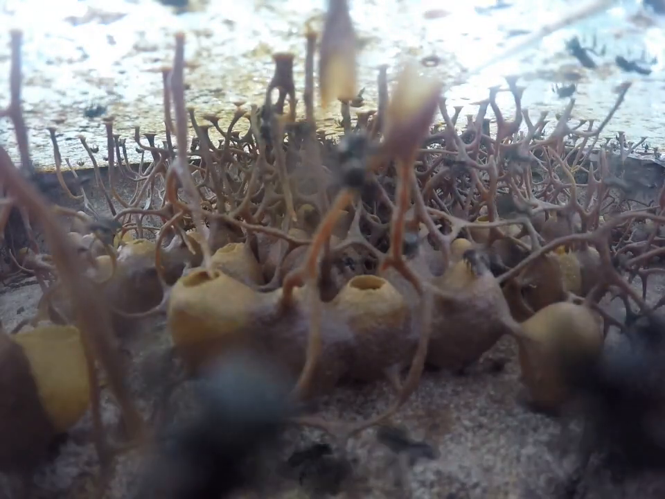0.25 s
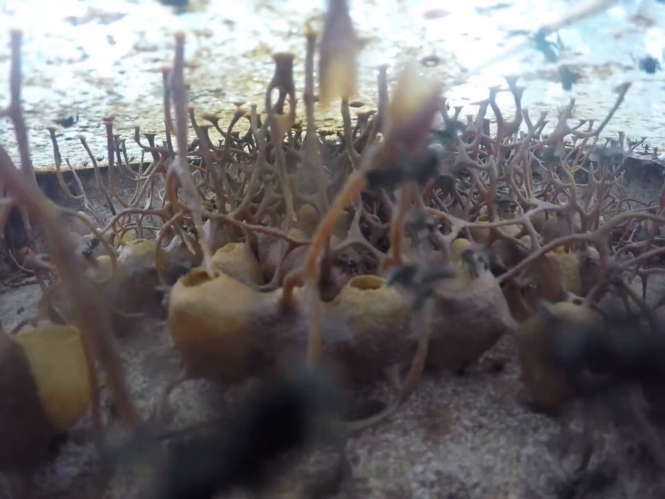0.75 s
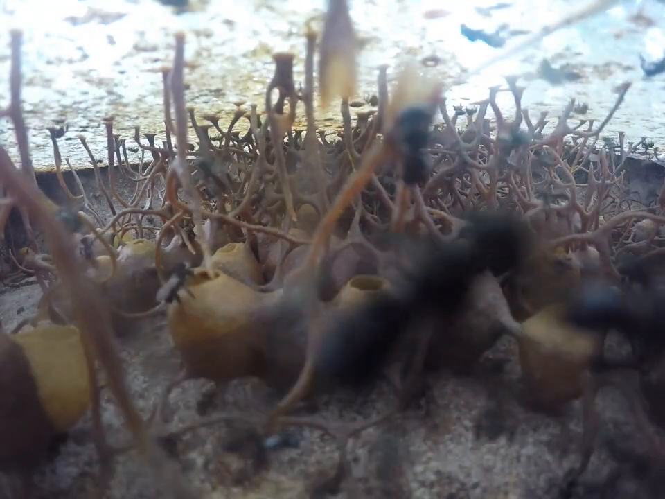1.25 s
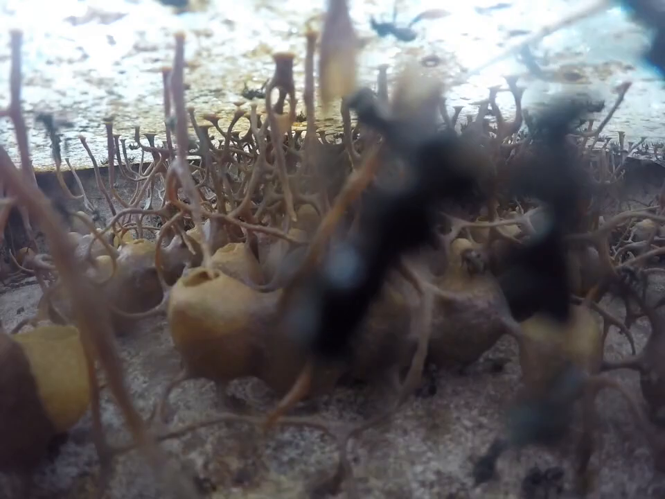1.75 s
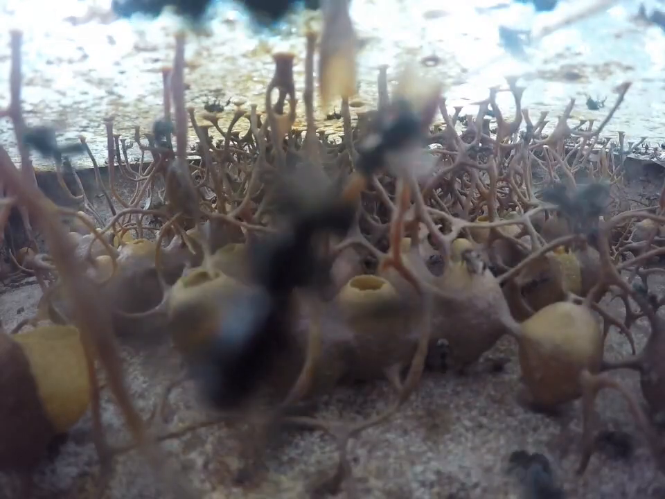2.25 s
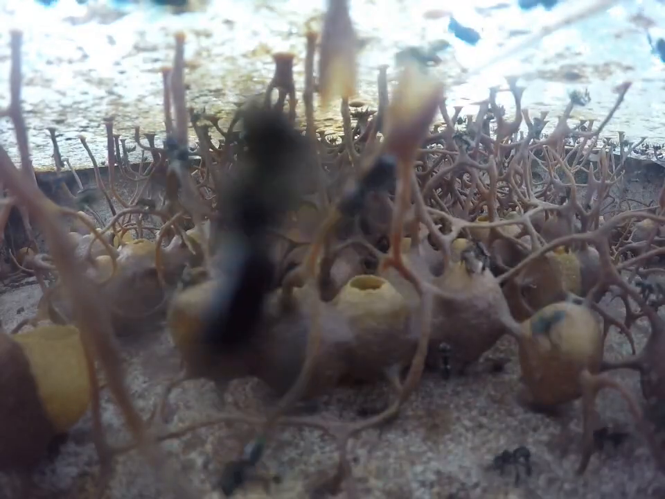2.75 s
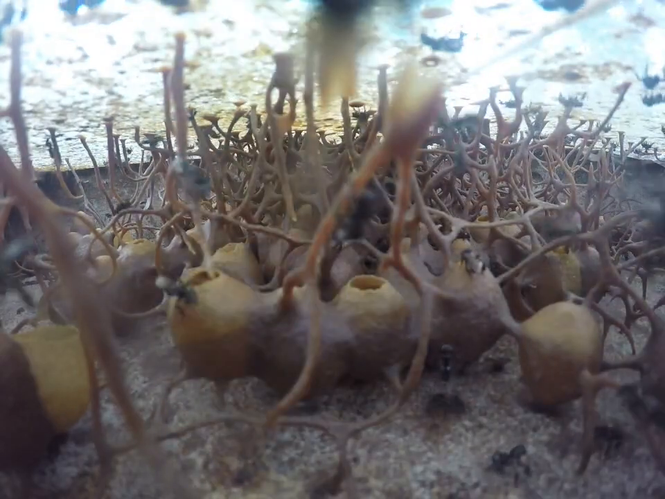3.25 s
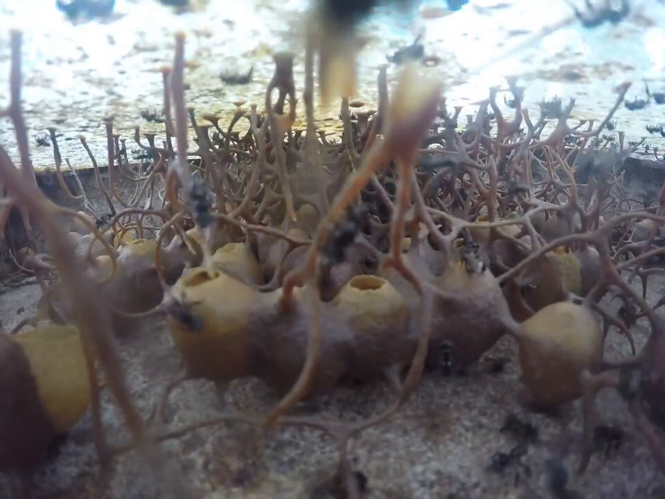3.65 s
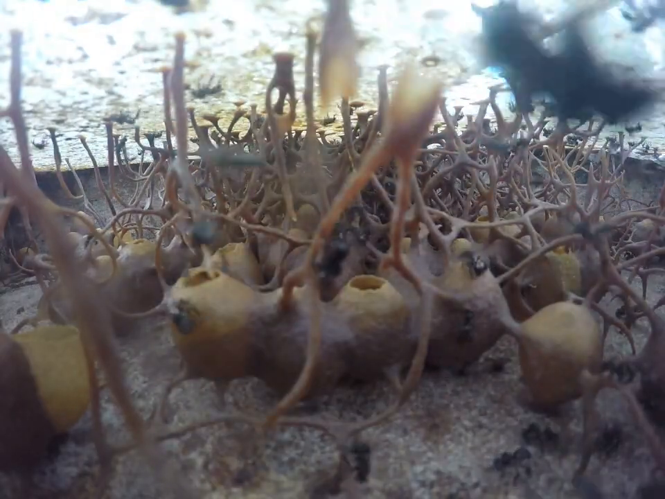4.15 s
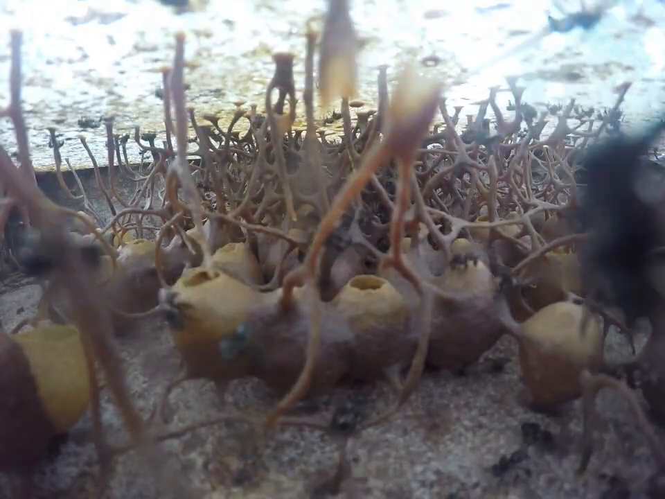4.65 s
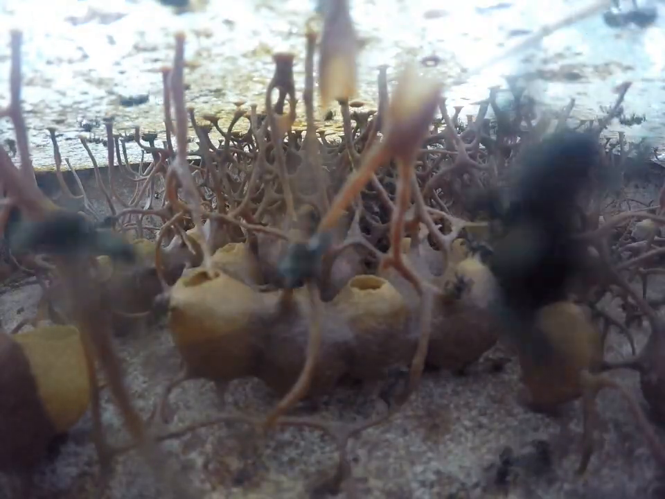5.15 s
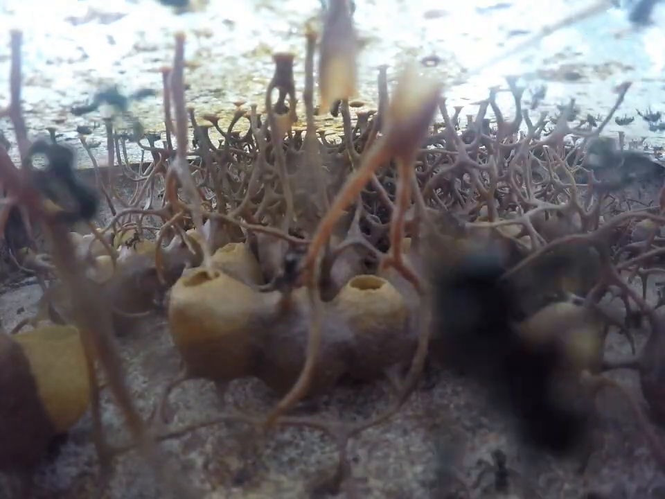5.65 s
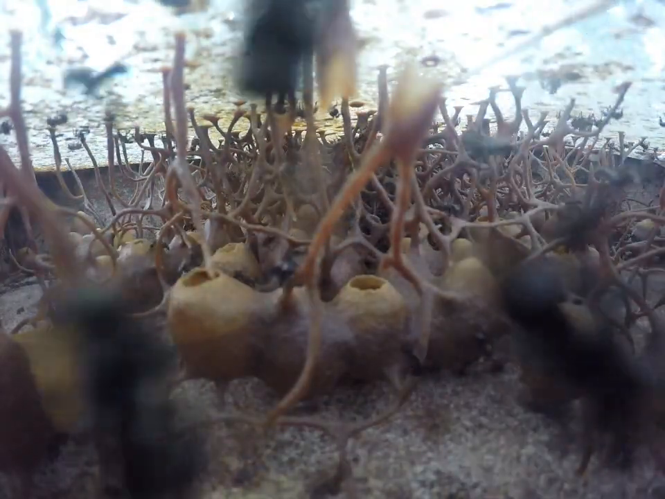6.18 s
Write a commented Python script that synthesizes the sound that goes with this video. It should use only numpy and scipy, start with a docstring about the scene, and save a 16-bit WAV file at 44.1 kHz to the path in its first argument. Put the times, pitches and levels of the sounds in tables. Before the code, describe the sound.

Stingless bees tick and scurry in a wooden nest box, wings buzzing in short raspy bursts, hitting the lid midway and drumming close at the end.

```python
"""Stingless bees inside a wooden nest box, one microphone by a small camera among their wax pots.
A faint hum deep in the nest, rumble, hiss and ticking feet run throughout; bodies bump hollow pots.
Early bursts of wing strokes brush wax struts some way in; each stroke is air puff, tap and bright scrape.
Scattered wing flicks go on between; midway a bee beats on the lid overhead, and hard clacks fall there.
At the end wings drum on the camera housing, which rings clearly."""
import sys
import numpy as np
from scipy import signal
from scipy.fft import rfft, irfft
from scipy.io import wavfile
from scipy.ndimage import uniform_filter1d, map_coordinates

SR = 44100
rng = np.random.default_rng(int(sys.argv[2]) if len(sys.argv) > 2 else 0)


def master_out(mix):
    """Clip the mix to full scale and print it as 16-bit PCM to the path in sys.argv[1]."""
    frames = np.transpose(np.atleast_2d(mix))
    ceiling = np.clip(frames, -1, 1)
    pcm = np.round(ceiling * 32767).astype(np.int16)
    wavfile.write(sys.argv[1], SR, pcm)


N = 283122
RING_SIZE = 2048   # samples in each impulse response and noise burst


def from_db(db):
    """Decibels to amplitude gain."""
    return 10 ** (np.asarray(db) / 20)


def rms_one(x):
    """Scale to rms 1."""
    return x / np.sqrt(np.mean(x ** 2) + 1e-20)


def unit_energy(x):
    """Scale to energy 1."""
    return x / np.sqrt(np.sum(x ** 2) + 1e-20)


def drift(rate_hz):
    """Smooth random wandering with a spread of about 1, from knots at the given rate."""
    knots = rng.standard_normal(1024)
    return map_coordinates(knots, [np.arange(N) / SR * rate_hz], order=3, mode="wrap")


def swell(t, middle_s, half_s):
    """A smooth rise and fall of height 1, down to 1/e at half_s from the middle."""
    return np.exp(-((t - middle_s) / half_s) ** 2)


def dying_noise(decay_s):
    """A burst of noise that dies away exponentially; energy 1."""
    t = np.arange(RING_SIZE) / SR
    return unit_energy(rng.standard_normal(RING_SIZE) * np.exp(-t / decay_s))


def minimum_phase(power):
    """The impulse response of a power spectrum with its energy as early as causality allows."""
    cepstrum = irfft(np.log(power + 1e-8) / 2)
    cepstrum[1:RING_SIZE // 2] *= 2
    cepstrum[RING_SIZE // 2 + 1:] = 0
    return irfft(np.exp(rfft(cepstrum)))


def responses(resonances):
    """Resonant impulse responses of a place, split into low (air), middle (tap) and high (scrape) parts."""
    # edges of the three parts [Hz]
    part_edges_hz = [150, 1750, 4000, 20000]
    hz = np.arange(RING_SIZE // 2 + 1) * SR / RING_SIZE + 1
    power = np.zeros(len(hz))
    for centre_hz, width_hz, level_db in resonances:
        offset = (hz - centre_hz) / width_hz
        power += from_db(level_db) ** 2 / (1 + offset ** 2 * 2) ** 2
    # overlapping weak modes fill the valleys
    power = power + from_db(-15.5) ** 2 * uniform_filter1d(power, size=121)
    parts = []
    for low_hz, high_hz in zip(part_edges_hz, part_edges_hz[1:]):
        band = 1 / (1 + (low_hz / hz) ** 16) / (1 + (hz / high_hz) ** 16)
        parts.append(minimum_phase(power * band))
    return parts


def in_box(drive, part, echo, echo_s):
    """Direct sound plus short reflections, whose pattern changes as the bee moves."""
    turns = rng.random() + 4.78 * np.arange(len(drive)) / SR   # 4.78 pattern cycles per second
    angle = 2 * np.pi * turns
    sound = signal.fftconvolve(drive, unit_energy(part))
    for weight in (np.cos(angle), np.sin(angle)):
        scatter = np.roll(dying_noise(echo_s), 16)   # 16 samples behind the direct sound
        reflections = unit_energy(signal.fftconvolve(part, scatter)[:RING_SIZE])
        sound += echo * signal.fftconvolve(drive * weight, reflections)
    return sound / np.sqrt(1 + echo ** 2)


def strokes(times_s, levels_db, place, rough, uneven_db, scrape_s, echo, echo_s):
    """A run of contacts, each a repeating click mixed with a fresh scatter of tiny contacts."""
    starts = np.round(np.asarray(times_s) * SR).astype(int)
    first = starts[0]
    size = starts[-1] - first + RING_SIZE
    force = rng.normal(0, 1, len(starts))
    out = np.zeros(N + 8 * RING_SIZE)
    reflected = (1.2, 1.1, .75)   # wax swallows the treble
    shares = np.clip(rough, 0, 1)
    for part, part_db, share, contact_s, wet in zip(place, levels_db, shares, scrape_s, reflected):
        drive = np.zeros(size)
        stroke_db = part_db + uneven_db * np.sqrt(share) * force
        gains = from_db(stroke_db) * np.sqrt(.004 * SR)   # each has the energy of 4 ms at its level
        for at, gain in zip(starts - first, gains):
            drive[at] += gain * np.sqrt(1 - share)
            drive[at:at + RING_SIZE] += gain * np.sqrt(share) * dying_noise(contact_s)
        sound = in_box(drive, part, wet * echo, echo_s)
        out[first:first + len(sound)] += sound
    return out[:N]


def background():
    """Noise shaped into low rumble and even hiss, with a soft boom of the box."""
    # spectrum of the steady noise, relative: frequency_hz, density_db (per Hz)
    noise_shape = [(12, -36), (20, 0.5), (55, -1.5), (70, -5.5), (130, -5.5), (172, -12), (255, -12),
                   (319, -11.5), (388, -13.5), (780, -14.5), (897, -13.5), (2910, -16.5), (5850, -24.5),
                   (14700, -33), (16000, -32)]
    level_db, boom_hz, boom_db = -52.5, 48, 6
    hz = np.arange(N // 2 + 1) * SR / N + 1
    points_hz, points_db = np.transpose(noise_shape)
    shape_db = np.interp(np.log(hz), np.log(points_hz), points_db)
    shape_db = shape_db + boom_db / (1 + ((hz - boom_hz) / 5) ** 2)
    spectrum = rfft(rng.standard_normal(N)) * from_db(shape_db)
    return from_db(level_db) * rms_one(irfft(spectrum, N))


def hum(rate_hz, level_db, overtones_db):
    """Wings beating in free air: a soft tone with a few overtones."""
    phase = 2 * np.pi * np.cumsum(rate_hz) / SR
    partials_db = [0, *overtones_db]
    tone = sum(from_db(db) * np.sin(k * phase) for k, db in enumerate(partials_db, 1))
    return from_db(level_db) * rms_one(tone)


def colony_hum():
    """Distant workers waver, swell and fade; nearer ones pass with a steadier, sinking note."""
    # humming workers deep in the nest, on average: wingbeat_hz, level_db
    deep_hummers = [(120, -67.5), (133, -63.5), (146, -65)]
    # a worker hums past nearer by: closest_s, half_length_s, wingbeat_hz (when closest), level_db
    near_passes = [(0.25, 0.08, 114, -56), (1.71, 0.08, 127, -56), (2.2, 0.22, 127.5, -54),
                   (5.302, 0.08, 128, -55)]
    sag_hz_per_s = 32
    out = np.zeros(N)
    for hz, level_db in deep_hummers:
        rate_hz = hz * (1 + .04 * drift(4) + 0.054 * drift(45))
        out += hum(rate_hz, level_db + 3.0 * drift(6), (-3, -15))
    t = np.arange(N) / SR
    waver = 1 + 0.0143 * drift(30)   # shared by all passes
    for closest_s, half_s, hz, level_db in near_passes:
        sinking_hz = hz - sag_hz_per_s * np.clip(t - closest_s, -2 * half_s, 2 * half_s)
        out += swell(t, closest_s, half_s) * hum(sinking_hz * waver, level_db, (-11, -19))
    return out


def scurry(place):
    """Many small feet tick on wax and wood, most of them faintly, in bouts near the microphone."""
    # bouts of scurrying: middle_s, half_length_s, level_db
    scurry_bouts = [(0.25, 0.31, -54), (0.787, 0.15, -54), (1.12, 0.17, -51), (1.45, 0.45, -60),
                    (2.366, 0.63, -54), (3.132, 0.098, -53.5), (3.608, 0.12, -45.5), (4.15, 0.67, -57.5),
                    (4.643, 0.16, -52.5), (4.975, 0.37, -56), (6.082, 0.041, -47), (6.296, 0.2, -51.5)]
    rest_db = -61.5   # between the bouts
    sizes_db = 4.1 * np.minimum(rng.exponential(1, N), 4)
    sizes = from_db(sizes_db) * rng.choice([-1, 1], N)
    steps_per_s = 600 * from_db(5 * drift(28))   # steps come in clumps
    steps = sizes * (rng.random(N) < steps_per_s / SR)
    part_gains = from_db([-10, .6, 0])
    body = sum(unit_energy(part) * gain for part, gain in zip(place, part_gains))
    spots = rng.integers(0, 10, N)   # each spot in the nest has its own echoes
    echoes = np.zeros(N)
    for spot in np.unique(spots):
        echoes += signal.oaconvolve(steps * (spots == spot), dying_noise(0.0027))[:N]
    ticks = signal.fftconvolve(steps + 2 * echoes, body)[:N]
    t = np.arange(N) / SR
    power = from_db(rest_db) ** 2
    for middle_s, half_s, level_db in scurry_bouts:
        power = power + (from_db(level_db) * swell(t, middle_s, half_s)) ** 2
    return np.sqrt(power) * rms_one(ticks)


def bumps():
    """Bodies bump hollow pots; each answers with a quickly damped resonance and a weaker overtone."""
    # dull bumps on wax pots: start_s, bumps (count), pot_hz, level_db
    pot_bumps = [(0.057, 1, 1250, -39.5), (0.545, 4, 1860, -48.5), (0.9297, 2, 1710, -41.5),
                 (2.441, 7, 1640, -42), (3.623, 1, 1530, -38.5), (3.839, 1, 1560, -39),
                 (4.945, 2, 1170, -43)]
    out = np.zeros(N)
    t = np.arange(RING_SIZE) / SR
    for start_s, count, pot_hz, level_db in pot_bumps:
        phase = 2 * np.pi * pot_hz * t
        pot = (np.sin(phase) + 0.15 * np.sin(2.25 * phase)) * t * np.exp(-t / 0.00034)
        pot = np.diff(pot, prepend=0)   # a small body radiates little bass
        times_s = start_s + .004 * np.arange(max(1, round(count)))
        out += strokes(times_s, [level_db], [pot], rough=[.25], uneven_db=2, scrape_s=[.001],
                       echo=.35, echo_s=.003)
    return out


def buzzes_on(surface):
    """The wing bursts played against one surface."""
    # bursts: surface, first_touch_s, hold_s, wingbeat start_hz, settled_hz, end_hz,
    # tap_db (mid-hold), swell_db (rise over the hold), air_db and scrape_db (relative to the tap)
    bursts = [("nest", 0.1, 0.069, 325, 252, 342, -43.5, 4.3, -1.2, -12),
              ("nest", 0.229, 0.032, 258, 268, 280, -45, 0.88, -2, 0.46),
              ("nest", 1.257, 0.063, 272, 249, 305, -39.5, 2, -4, 2),
              ("close", 2.8305, 0.231, 224, 229, 272, -34.5, 4.7, -7.5, -2.6),
              ("close", 3.4333, 0.071, 237, 238, 284, -29.5, 1, -11.5, -3),
              ("housing", 6.287, 0.00084, 150, 172, 190, -28.5, 0, -16.5, -16.5),
              ("housing", 6.3603, 0.028, 162, 228, 250, -22, 10.5, -18.5, -17)]
    return [row[1:] for row in bursts if row[0] == surface]


def buzz(row, place, back_db, back_phase, release_db_per_s, air_lag_s, scrape_lag_s,
         approach_s=0, impact_db=0, **contact):
    """The wingbeat settles, then shifts as it fades; each downstroke has a weaker return stroke."""
    # the bee strains against the surface: middle_s, half_length_s, wingbeat_gain_hz, level_gain_db
    strains = [(0.173, 0.007, 0.5, 1), (1.296, 0.0037, 0.5, 1), (2.874, 0.029, 25, 0.5),
               (2.989, 0.021, 15.5, 4), (3.027, 0.0095, -0.5, 3)]
    settle_share = 0.3   # time constant of the settling, as a share of the hold
    shift_s = 0.006   # time scale of the wingbeat's shift around the end of the hold
    scrape_swell_share = 0.36   # pressing harder adds little scrape
    approach_db = -13.5   # before the wings touch fully
    release_s = 0.04   # strokes run on this long after the hold
    start, hold, start_hz, settled_hz, end_hz, tap_db, swell_db, air_db, scrape_db = row

    t = np.arange(-approach_s, hold + release_s, 1 / SR)
    held = np.clip(t / max(hold, 1 / SR), 0, 1)
    strain_hz, strain_db = np.zeros(len(t)), np.zeros(len(t))
    for middle_s, half_s, gain_hz, gain_db in strains:
        effort = swell(start + t, middle_s, half_s)
        strain_hz += gain_hz * effort
        strain_db += gain_db * effort
    rate_hz = settled_hz + (start_hz - settled_hz) * np.exp(-held / settle_share) + strain_hz
    rate_hz = rate_hz + (end_hz - settled_hz) / (1 + np.exp((hold - t) / shift_s))

    turns = np.cumsum(rate_hz) / SR
    turns = turns - np.interp(0, t, turns)   # beat 0 is the first touch
    beats = np.arange(np.ceil(turns[0]), turns[-1])
    phases = np.ravel([beats, beats + np.clip(back_phase, .2, .8)], order="F")
    jitter_s = 0.00001 * rng.standard_normal(len(phases))   # no two strokes are evenly spaced
    times = np.interp(phases, turns, t) + jitter_s

    stroke_db = tap_db + np.tile([0, back_db], len(beats))
    stroke_db = stroke_db + approach_db * (phases < 0) + impact_db * (phases == 0)
    press_db = np.interp(times, t, swell_db * (held - .5) + strain_db)
    # air, tap and scrape fade from their own moments
    parts = [(air_db + press_db, hold + air_lag_s),
             (press_db, hold),
             (scrape_db + scrape_swell_share * press_db, hold + np.clip(scrape_lag_s, -hold, hold))]
    levels_db = [stroke_db + part_db - release_db_per_s * np.maximum(times - fade_from, 0)
                 for part_db, fade_from in parts]
    return strokes(start + times, levels_db, place, **contact)


def nest_buzzes(place):
    """Wings brush the wax struts some way into the box."""
    return sum(buzz(row, place, back_db=-16.5, back_phase=0.457, release_db_per_s=477,
                    air_lag_s=0.00089, scrape_lag_s=0.0011,
                    rough=(.1, .25, .6), uneven_db=3.0, scrape_s=(.0015, .0015, .001),
                    echo=0.88, echo_s=0.0019) for row in buzzes_on("nest"))


def flicks(place):
    """Single wing touches and flicks of a few uneven, fading strokes."""
    # wing flicks: start_s, strokes (count), tap_db, scrape_db (levels of the first stroke)
    wing_flicks = [(0.156, 1, -39.5, -56), (0.192, 3, -47, -68), (0.255, 2, -38, -30.5),
                   (0.297, 6, -47, -50), (0.356, 1, -53, -44.5), (1.032, 3, -49.5, -51.5),
                   (1.105, 3, -47, -45.5), (1.165, 1, -40.5, -50.5), (1.35, 2, -51, -62),
                   (1.374, 2, -44, -39.5), (1.389, 4, -44.5, -44.5), (1.408, 3, -42.5, -56),
                   (1.695, 3, -51, -42), (1.81, 3, -45, -42), (1.844, 4, -49, -45), (1.881, 3, -46, -44),
                   (1.943, 1, -43, -42.5), (1.949, 1, -47, -51), (2.034, 1, -46, -48),
                   (2.046, 6, -50.5, -47.5), (2.092, 3, -43, -40.5), (2.133, 2, -45, -47),
                   (2.172, 1, -37.5, -47), (2.393, 9, -50.5, -49.5), (2.55, 1, -43, -55),
                   (2.752, 1, -44, -43), (2.757, 1, -45, -39.5), (3.102, 1, -47, -45),
                   (3.116, 2, -47.5, -43), (3.145, 2, -40.5, -45.5), (3.156, 2, -41, -54),
                   (3.581, 4, -49, -48.5), (3.876, 1, -39.5, -50), (4.225, 2, -45.5, -58),
                   (4.263, 1, -42, -52), (4.383, 1, -39, -44), (4.407, 1, -44, -45), (4.44, 2, -49, -45.5),
                   (4.626, 7, -65, -51.5), (4.944, 2, -40.5, -68), (6.198, 1, -37.5, -49),
                   (6.207, 1, -44, -63), (6.222, 2, -36.5, -46)]
    air_db, fade_db = -11.5, 0.7   # air puff relative to the tap; loss from stroke to stroke
    out = np.zeros(N)
    for start_s, count, tap_db, scrape_db in wing_flicks:
        gaps_s = 0.0049 * from_db(rng.normal(0, 1.3, max(1, round(count))))
        times_s = start_s + np.cumsum(gaps_s) - gaps_s[0]
        loss_db = fade_db * np.arange(len(times_s))
        levels_db = [part_db - loss_db for part_db in (tap_db + air_db, tap_db, scrape_db)]
        out += strokes(times_s, levels_db, place, rough=(.4, .4, .5), uneven_db=2.0,
                       scrape_s=(.0012, .001, .0009), echo=0.82, echo_s=0.0052)
    return out


def close_buzzes(place):
    """A bee beats against the lid right above the microphone."""
    return sum(buzz(row, place, back_db=-6.5, back_phase=.6, release_db_per_s=695,
                    air_lag_s=0.0039, scrape_lag_s=-0.0086, approach_s=.03, impact_db=1.5,
                    rough=(.1, .3, .55), uneven_db=3.0, scrape_s=(.002, .0025, .0013),
                    echo=0.72, echo_s=0.0028) for row in buzzes_on("close"))


def clacks(place):
    """Wing tips strike the lid: short, hard contacts, mostly treble."""
    # hard contacts on the lid: start_s, level_db (of the treble)
    lid_clacks = [(3.4, -42.5), (3.4293, -35), (3.4332, -28.5), (3.4373, -29)]
    times_s, level_db = np.transpose(lid_clacks)
    levels_db = [level_db + part_db for part_db in (-18, -6, 0)]
    return strokes(times_s, levels_db, place, rough=(.3, .3, .5), uneven_db=1.0,
                   scrape_s=(.0005, .0005, .0005), echo=0.29, echo_s=0.0027)


def housing_buzzes(place):
    """Wings drum on the camera housing, which rings clearly."""
    return sum(buzz(row, place, back_db=-7.0, back_phase=0.39, release_db_per_s=900,
                    air_lag_s=0.0084, scrape_lag_s=0.013, impact_db=5,
                    rough=(.03, .03, .12), uneven_db=11.0, scrape_s=(.001, .001, .0006),
                    echo=0.37, echo_s=0.0053) for row in buzzes_on("housing"))


def scene():
    """All the bees and the box around them, heard by one microphone."""
    # resonances of the wax struts some way in: centre_hz, width_hz, level_db (relative)
    nest_resonances = [(254, 140, -9), (504, 85, -16.5), (1060, 440, -6), (1940, 380, -1), (2590, 470, 8.5),
                       (3200, 630, 6), (4620, 1000, 0), (5660, 300, -8.5), (6480, 320, -7), (7080, 530, -4),
                       (8240, 990, -11), (9280, 950, -6), (10600, 1200, -13.5), (12660, 1100, -9),
                       (15200, 810, -20)]
    # resonances of the lid right above the microphone: centre_hz, width_hz, level_db (relative)
    lid_resonances = [(235, 270, -9.5), (490, 180, -19), (950, 234, 3.5), (1410, 110, 0.5), (2080, 255, -2),
                      (2606, 500, -0.5), (3140, 350, -6), (3610, 640, -7), (4600, 700, -7),
                      (5500, 320, -14), (6920, 1200, -4), (8300, 1100, -14), (9500, 600, -12),
                      (10400, 700, -11), (12530, 1300, -16), (14700, 1200, -20)]
    # resonances of the camera housing: centre_hz, width_hz, level_db (relative)
    housing_resonances = [(239, 77, -15.5), (775, 130, -8), (1100, 210, -5.5), (2160, 370, -4.5),
                          (2250, 160, -2), (2516, 160, 1.5), (3040, 240, -1.5), (3500, 160, -13.5),
                          (4450, 600, -20), (5530, 430, -14), (6700, 280, -13), (7440, 870, -20),
                          (9400, 450, -33), (12500, 3800, -42)]
    nest, lid = responses(nest_resonances), responses(lid_resonances)
    housing = responses(housing_resonances)
    throughout = background() + colony_hum() + scurry(nest)
    touches = bumps() + flicks(nest) + clacks(lid)
    bursts = nest_buzzes(nest) + close_buzzes(lid) + housing_buzzes(housing)
    return (throughout + touches + bursts)[None]


def record(dry):
    """A steep elliptic low-pass cuts off the top of the treble."""
    cutoff_hz = 15450
    lowpass = signal.ellip(12, .1, 80, cutoff_hz, fs=SR, output="sos")
    return signal.sosfilt(lowpass, dry)


dry = scene()
out = record(dry)
master_out(out)
```